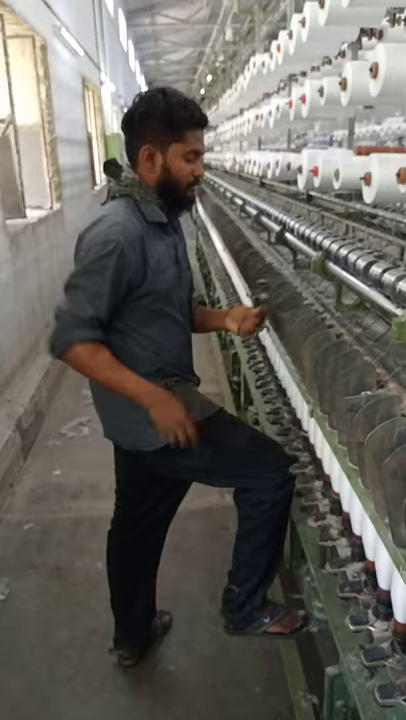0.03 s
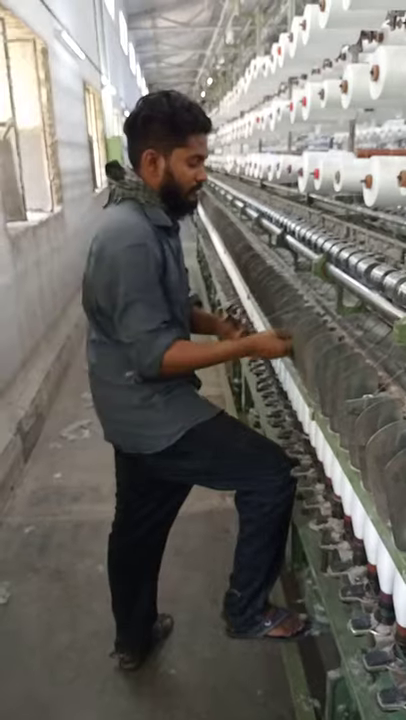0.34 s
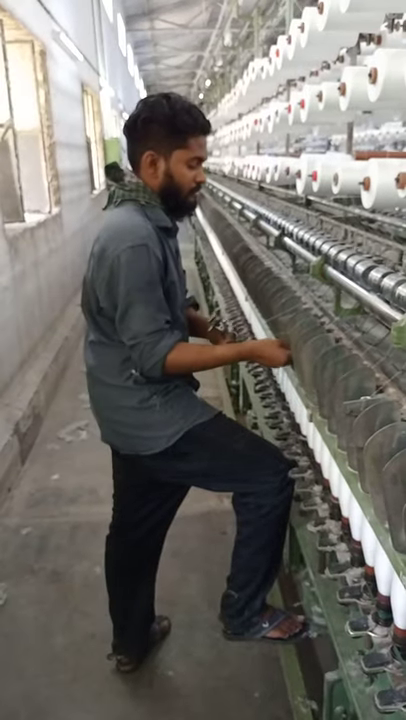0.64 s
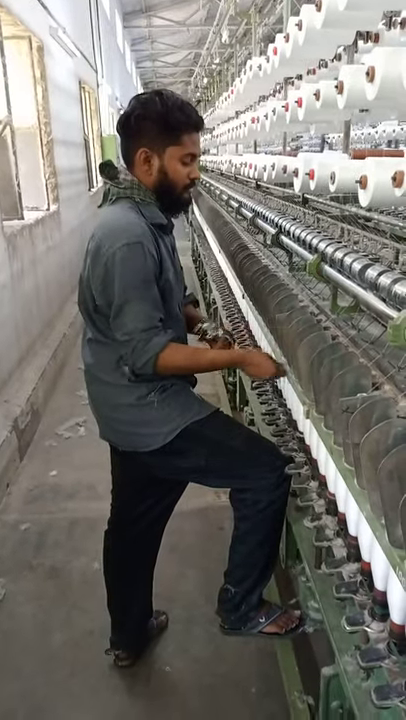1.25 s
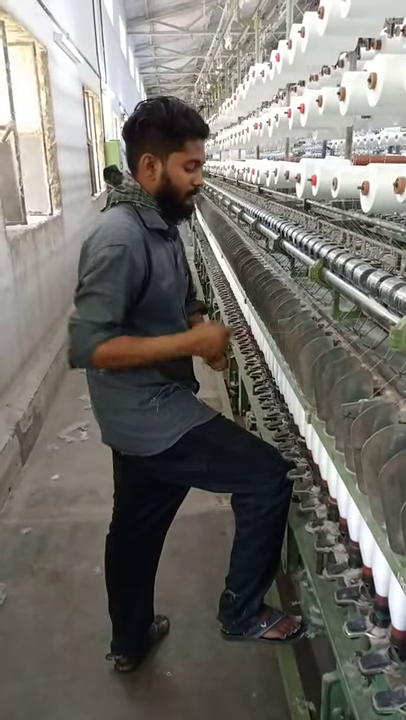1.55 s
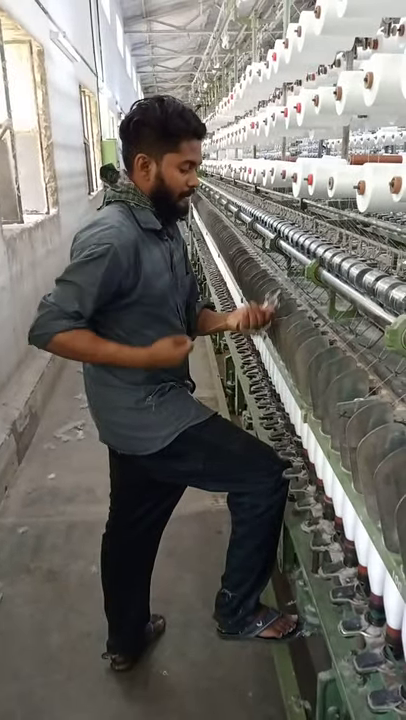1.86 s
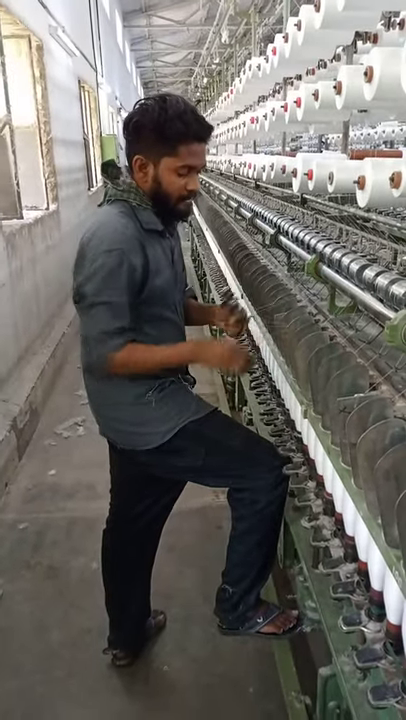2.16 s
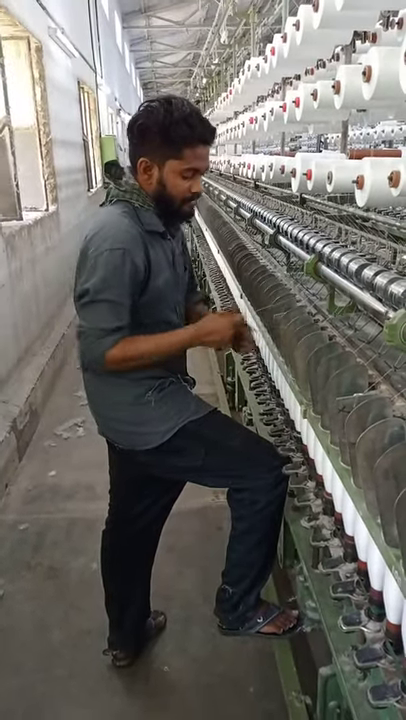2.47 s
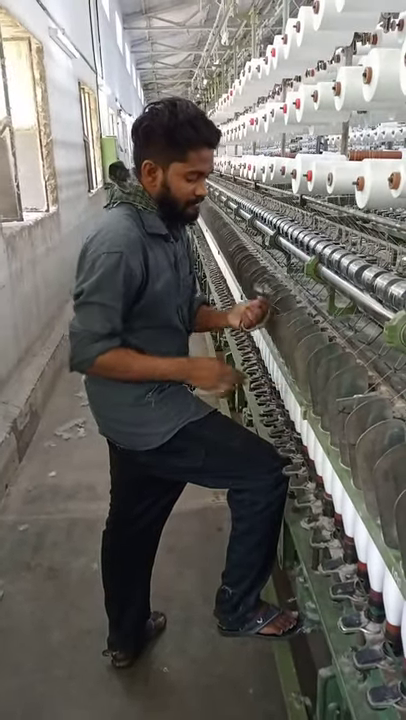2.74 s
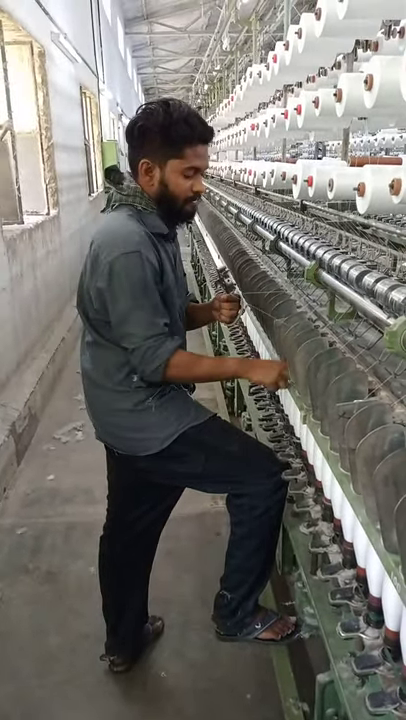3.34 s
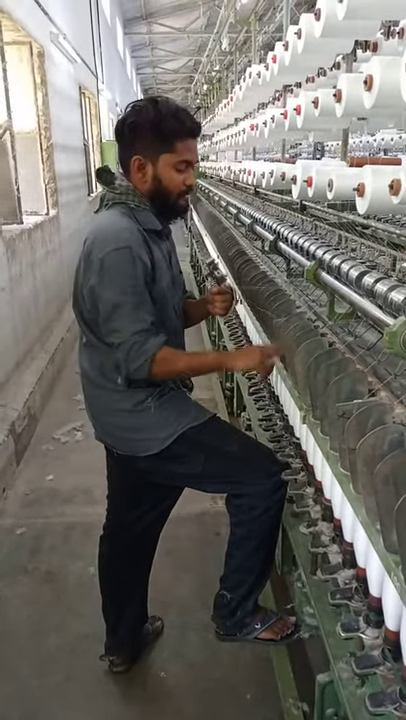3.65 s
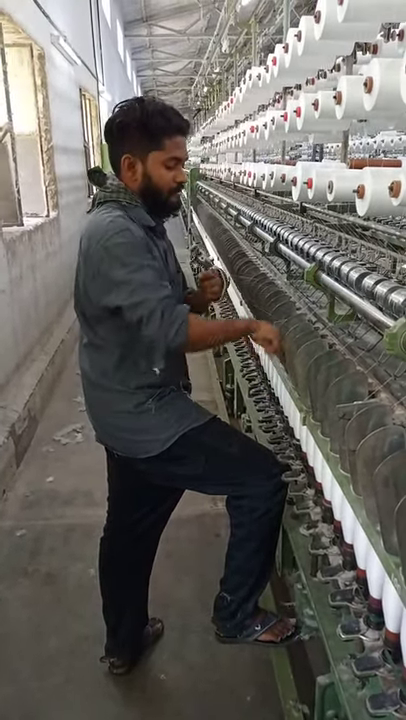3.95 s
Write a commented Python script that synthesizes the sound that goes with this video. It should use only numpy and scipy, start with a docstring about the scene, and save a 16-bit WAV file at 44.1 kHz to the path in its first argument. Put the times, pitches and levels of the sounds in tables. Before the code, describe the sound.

Textile spinning machinery fades in quickly and roars at constant speed, heard close by in a large mill. Spindles hum with a low throb, while a wavering whirr surges unevenly over a light metallic hiss.

```python
"""A big mill hall, where long ring-spinning frames run at constant speed.
Countless rollers, belts and gears merge into a dense roar; steel travellers hiss by sliding friction
on their rings, and bearings whine thinly. Rows of spindles turn at slightly unequal rates, so their
hums beat, while the drives force the frame's resonances into a surging whirr near 1 kHz.
The sound fades in at the start."""
import sys
import numpy as np
from scipy import signal
from scipy.fft import rfft, irfft
from scipy.io import wavfile
from scipy.ndimage import uniform_filter1d, minimum_filter1d

SR = 44100
rng = np.random.default_rng(int(sys.argv[2]) if len(sys.argv) > 2 else 0)


def int16_out(signal):
    """Quantize to a 16-bit WAV file."""
    q = np.round(np.clip(np.atleast_2d(signal).T, -1, 1) * 32767)
    wavfile.write(sys.argv[1], SR, q.astype(np.int16))


N = 176400
TIME = np.arange(N) / SR
BINS_HZ = np.maximum(np.arange(N // 2 + 1) * SR / N, 1)


def from_db(db):
    """Amplitude ratio of a level in decibels."""
    return 10 ** (np.asarray(db) / 20)


def unit_rms(x):
    """Normalisation to an rms of one."""
    return x / np.sqrt(np.mean(x ** 2) + 1e-20)


def filtered_noise(gain):
    """Linear filtering: white noise weighted by a gain at each frequency, at unit rms."""
    return unit_rms(irfft(rfft(rng.standard_normal(N)) * gain, N))


def drift(rate_hz):
    """Low-pass noise: a random fluctuation of unit rms, mostly slower than rate_hz."""
    return filtered_noise(1 / (1 + (BINS_HZ / rate_hz) ** 2))


def flickering_noise(spectrum, flicker_db, flicker_hz=5.8, bands=22):
    """Noise of a given spectral density, each band under its own random amplitude modulation."""
    hz, db = np.transpose(spectrum)
    density = from_db(np.interp(np.log(BINS_HZ), np.log(hz), db))
    shaped = rfft(rng.standard_normal(N)) * density * np.sqrt(SR / 2)
    band = np.digitize(BINS_HZ, np.geomspace(200, 13000, bands - 1))
    return sum(irfft(shaped * (band == k), N) * from_db(flicker_db * drift(flicker_hz))
               for k in range(bands))


def resonances(modes):
    """Random excitation: each resonance passes a narrow band of noise around its frequency."""
    return sum(from_db(db) * filtered_noise(1 / (1 + ((BINS_HZ - hz) / (width * np.pi / 4)) ** 2))
               for hz, width, db in modes)


def swells(rows):
    """An envelope of Gaussian rises that add in power, each length taken at half amplitude."""
    rises = (from_db(db) * .5 ** ((2 * (TIME - centre) / length) ** 2) for centre, length, db in rows)
    return np.sqrt(sum(rise ** 2 for rise in rises))


def wavering_tone(hz, waver_hz, rate_hz):
    """Random frequency modulation: a sine whose pitch strays by waver_hz rms."""
    pitch_hz = hz + waver_hz * drift(rate_hz)
    return unit_rms(np.sin(2 * np.pi * np.cumsum(pitch_hz) / SR))


def hall_roar(flutter_db=0.72, flutter_hz=35):
    """Incoherent addition: countless rollers, belts and gears blur into broadband noise in the hall."""
    # Spectrum of the roar. Each row: frequency in Hz, spectral density level in dB.
    spectrum = [(20, -98), (45, -98), (68, -64), (110, -60), (165, -54), (225, -56.5), (270, -53),
                (335, -54.5), (380, -51), (410, -52), (500, -51.5), (650, -52), (820, -50.5), (1100, -49.5),
                (1250, -48), (1400, -46.5), (1620, -47.4), (1740, -46.5), (1880, -49.5), (2000, -53.5),
                (2450, -56), (2700, -55.3), (2950, -60), (3450, -66.5), (5000, -85), (9000, -105)]
    # Slow rise and fall of the roar. Each row: time in seconds, gain in dB.
    level_curve = [(.3, 0.5), (.55, 0.9), (.8, 0.1), (1.1, -0.1), (1.55, 0), (1.8, 0.2), (2.1, 0),
                   (2.27, -.8), (2.5, 0), (2.95, .2), (3.3, -0.8), (3.6, -0.5), (3.8, -0.1), (4, 0)]
    gain_db = np.interp(TIME, *np.transpose(level_curve)) + flutter_db * drift(flutter_hz)
    return from_db(gain_db) * flickering_noise(spectrum, flicker_db=1.34)


def travellers(flutter_db=0.38, flutter_hz=35):
    """Sliding friction: steel clips race round their rings with a slightly fluttering hiss."""
    # Spectrum of the hiss. Each row: frequency in Hz, spectral density level in dB.
    spectrum = [(2000, -81), (3400, -68), (4050, -64.5), (4620, -67), (5000, -73.5), (5380, -75),
                (5900, -70), (7300, -69.5), (7750, -69), (8200, -66.5), (8600, -68), (8950, -71.5),
                (9180, -72.5), (9600, -83), (10700, -89), (12000, -86), (13600, -80.5), (15500, -84)]
    return from_db(flutter_db * drift(flutter_hz)) * flickering_noise(spectrum, flicker_db=0.84)


def bearings(gain_db=0.5):
    """Narrow-band noise has a pitch but no steady amplitude: the bearings whine thinly and unevenly."""
    # Bearing whines. Each row: frequency in Hz, width in Hz, relative level in dB.
    whines = [(1490, 5, -39), (1668, 5, -41), (4050, 30, -53), (5900, 55, -48), (5914, 10, -52),
              (6030, 45, -48), (6042, 5, -52), (6115, 35, -53), (6191, 8, -52), (6344, 22, -52.5),
              (6795, 20, -55), (6890, 90, -55), (8576, 20, -55)]
    return from_db(gain_db) * resonances(whines)


def spindles(per_bank=16):
    """Beating: each spindle hums at its own turning rate, so a bank drifts in and out of phase."""
    # Banks of spindles. Each row: mean turning rate in Hz, its standard deviation in Hz, level in dB.
    banks = [(146.7, 3.5, -37), (181.8, 3, -33.5), (279, 7.8, -39), (297.4, 5, -41.5), (453.5, 7, -37.5),
             (75, 1.28, -56), (103, 1.7, -48.5)]
    hum = np.zeros(N)
    for hz, spread_hz, db in banks:
        rates_hz = hz + spread_hz * rng.standard_normal(per_bank)
        phases = rng.random(per_bank)
        bank = sum(np.sin(2 * np.pi * (rate * TIME + phase)) for rate, phase in zip(rates_hz, phases))
        hum += from_db(db) * unit_rms(bank)
    return hum


def near_spindles(gain_db=-4):
    """Amplitude modulation: the beating of the closest spindles is heard as one throbbing tone."""
    # Swells of the hum. Each row: centre in seconds, length in seconds, relative peak level in dB.
    throbs = [(0.2, 0.18, -22.5), (0.54, 0.13, -26.5), (0.82, 0.11, -24.0), (0.95, 0.11, -26.5),
              (1.09, 0.095, -23), (1.23, 0.1, -26), (1.36, 0.11, -23), (1.52, 0.071, -21),
              (1.65, 0.13, -22.5), (1.98, 0.089, -19), (2.19, 0.085, -23), (2.32, 0.051, -32),
              (2.48, 0.11, -19), (2.64, 0.099, -25.5), (2.81, 0.088, -20), (2.98, 0.091, -16.5),
              (3.11, 0.057, -19.5), (3.26, 0.063, -22), (3.45, 0.069, -17), (3.61, 0.12, -21.5),
              (3.93, 0.37, -23)]
    return from_db(gain_db) * swells(throbs) * wavering_tone(149.3, waver_hz=2.0, rate_hz=5.04)


def drives(steady_db=-19, surge_db=-3.5, averaging_s=0.27):
    """Forced vibration: the drives keep the frame whirring, and in surges sing out as a wavering tone."""
    # Resonances of the frame. Each row: frequency in Hz, width in Hz, relative level in dB.
    frame_modes = [(901, 43, -4.5), (959, 81, 0), (1080, 99, -3)]
    # Surges of the whirr. Each row: centre in seconds, length in seconds, relative peak level in dB.
    surges = [(0.194, 0.076, -9.5), (0.417, 0.038, -12.5), (0.463, 0.028, -14), (0.528, 0.05, -9.5),
              (0.572, 0.014, -8), (0.629, 0.033, -13.5), (0.808, 0.068, -10.5), (0.917, 0.044, -13.0),
              (0.986, 0.024, -15), (1.187, 0.043, -10.5), (1.26, 0.012, -9), (1.351, 0.011, -4.5),
              (1.446, 0.024, -9.5), (1.928, 0.076, -12.5), (1.974, 0.017, -15), (2.123, 0.022, -8.5),
              (2.289, 0.039, -14), (2.451, 0.082, -9.5), (2.603, 0.031, -13.5), (2.783, 0.052, -14),
              (2.91, 0.1, -13), (3.035, 0.17, -14.5), (3.145, 0.039, -13), (3.227, 0.017, -12),
              (3.471, 0.029, -11.5), (3.722, 0.03, -10), (3.823, 0.033, -14), (3.875, 0.021, -10)]
    whirr = resonances(frame_modes)
    running_power = np.abs(uniform_filter1d(whirr ** 2, int(averaging_s * SR)))
    steady = whirr / np.sqrt(running_power + 1e-12)
    singing = swells(surges) * wavering_tone(972, waver_hz=46.05, rate_hz=30)
    return from_db(steady_db) * steady + from_db(surge_db) * singing


def scene():
    """Superposition: the sounds of all the machinery add at one point in the aisle."""
    return (spindles() + near_spindles() + drives() + hall_roar() + travellers() + bearings())[None]


def record(dry):
    """Gain control and filtering: a fade-in, a peak limiter and a steep low-pass."""
    start_s, fade_s, floor = .079, .23, from_db(-19)
    ramp = np.clip((TIME - start_s) / fade_s, 0, 1) ** 1.42
    faded = dry * (TIME >= start_s) * (floor + (1 - floor) * ramp)
    ceiling, window = .88, int(.004 * SR)
    needed_gain = ceiling / np.maximum(np.abs(faded), ceiling)
    smooth_gain = uniform_filter1d(minimum_filter1d(needed_gain, window), window)
    low_pass = signal.ellip(12, .1, 90, 15600, fs=SR, output="sos")   # cuts above 15.6 kHz
    return signal.sosfilt(low_pass, faded * smooth_gain)


dry = scene()
out = record(dry)
int16_out(out)
```